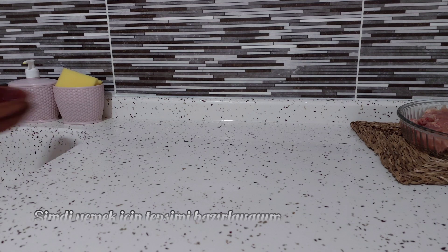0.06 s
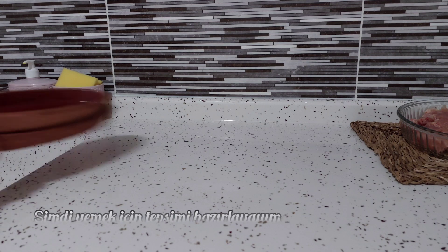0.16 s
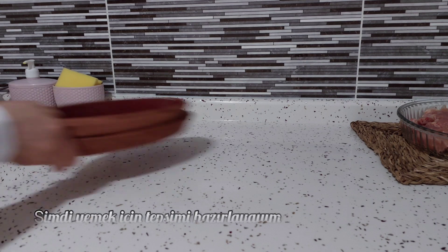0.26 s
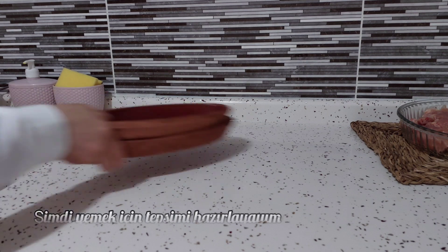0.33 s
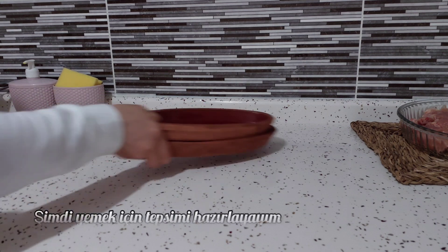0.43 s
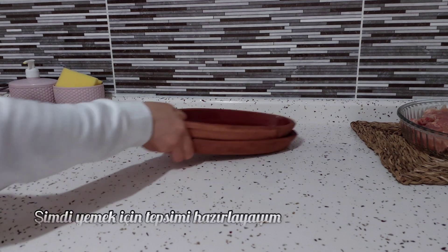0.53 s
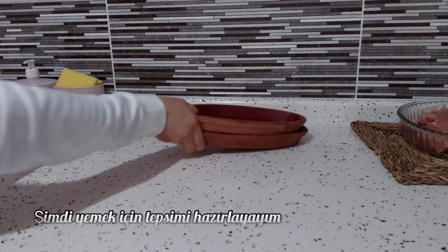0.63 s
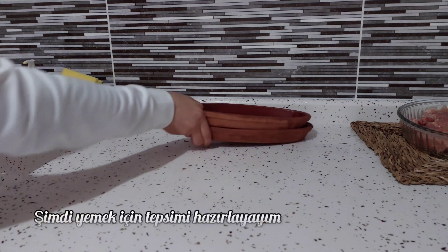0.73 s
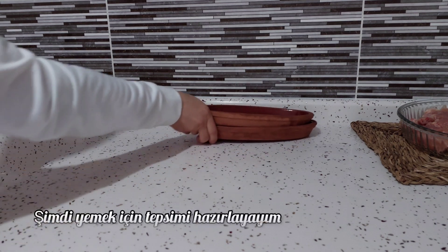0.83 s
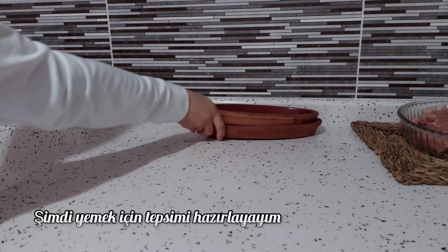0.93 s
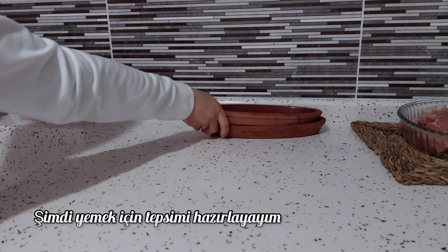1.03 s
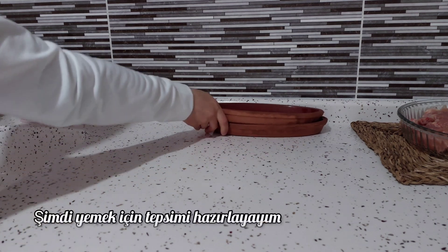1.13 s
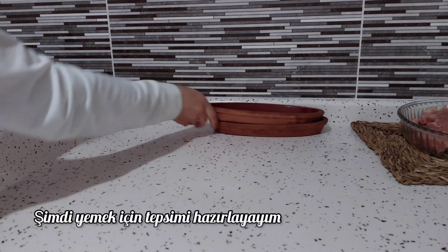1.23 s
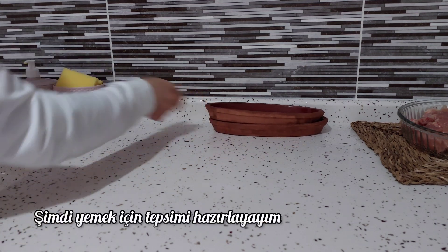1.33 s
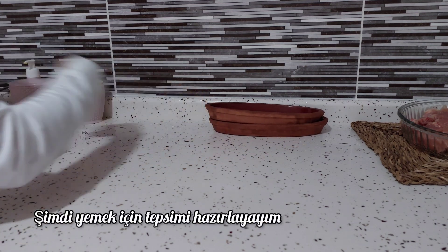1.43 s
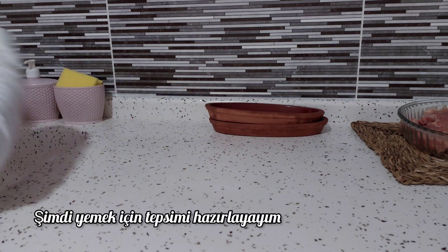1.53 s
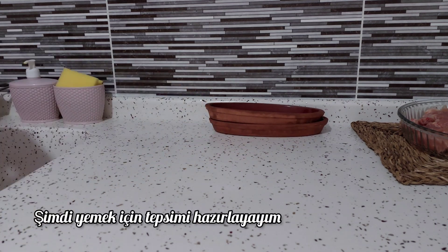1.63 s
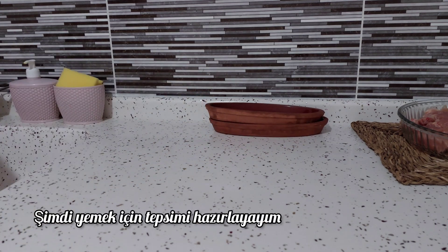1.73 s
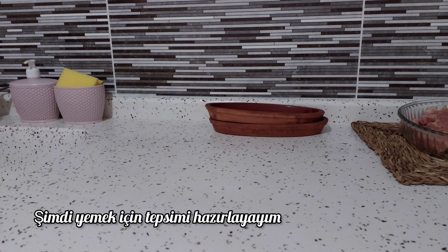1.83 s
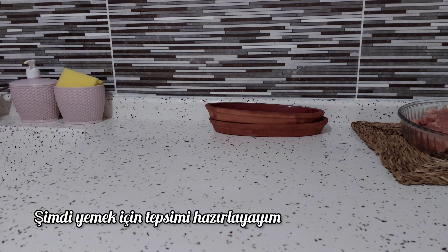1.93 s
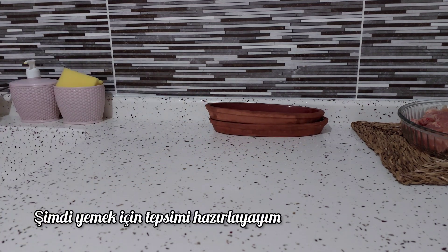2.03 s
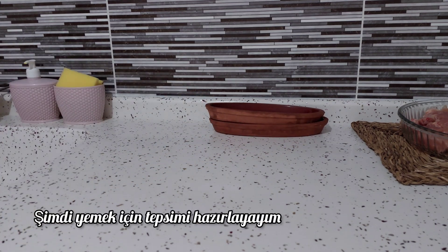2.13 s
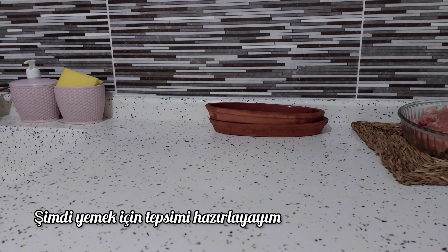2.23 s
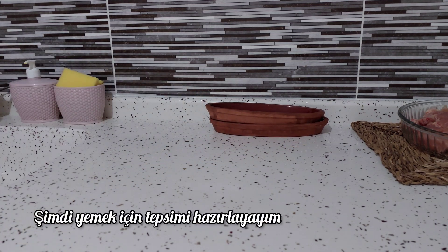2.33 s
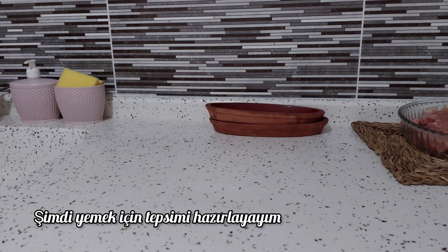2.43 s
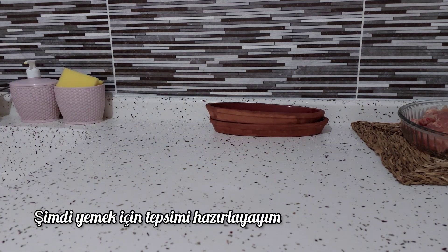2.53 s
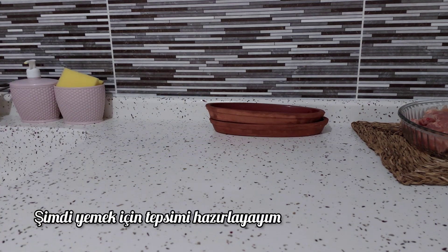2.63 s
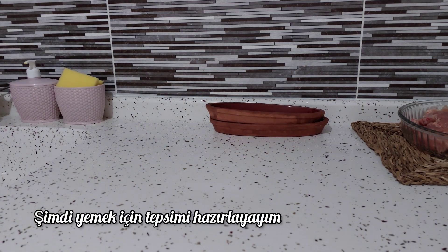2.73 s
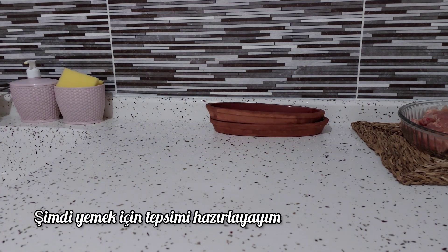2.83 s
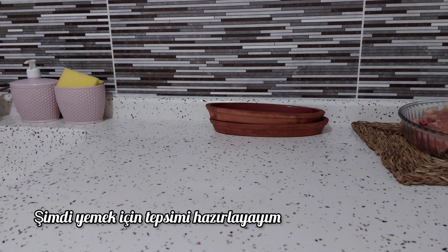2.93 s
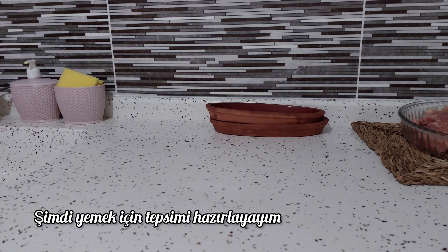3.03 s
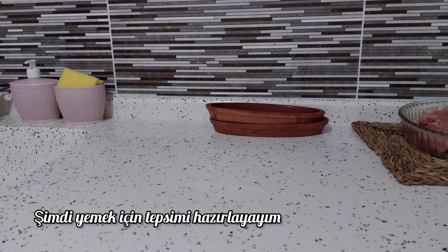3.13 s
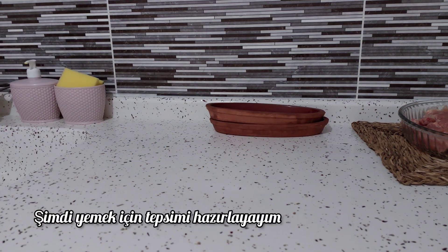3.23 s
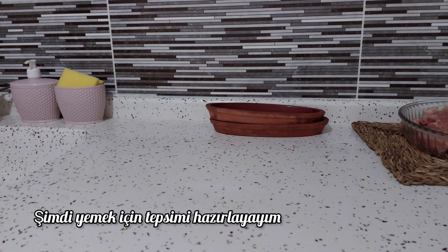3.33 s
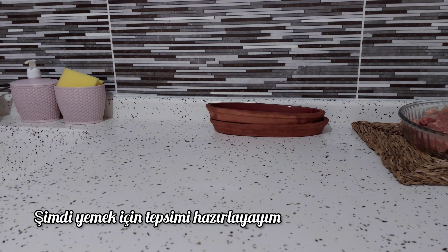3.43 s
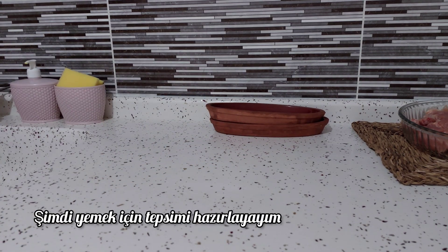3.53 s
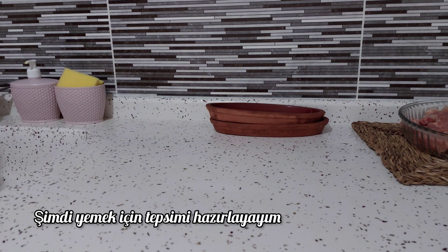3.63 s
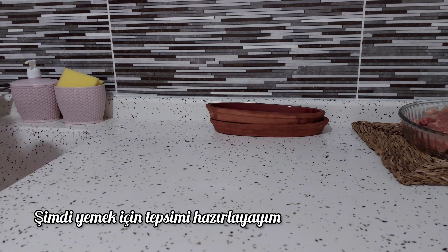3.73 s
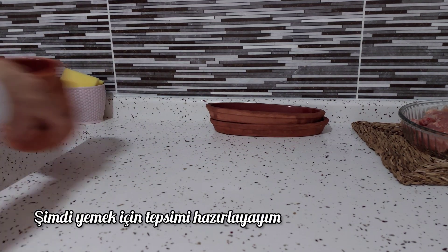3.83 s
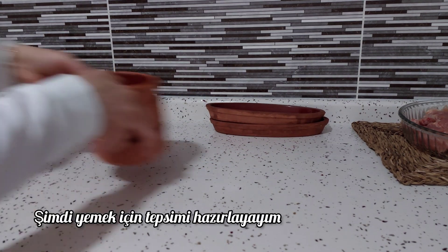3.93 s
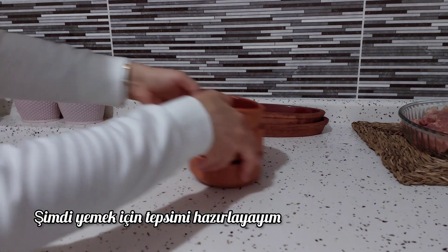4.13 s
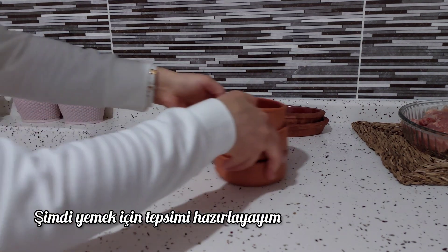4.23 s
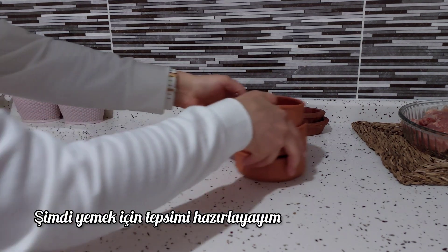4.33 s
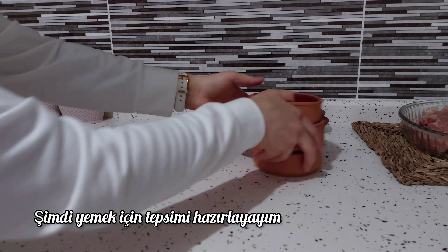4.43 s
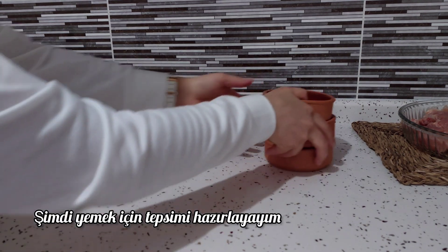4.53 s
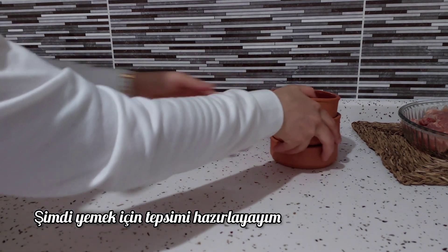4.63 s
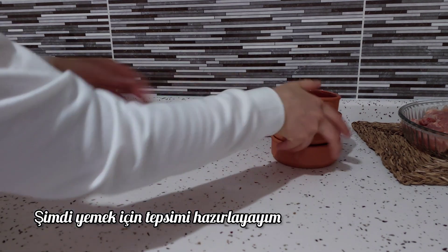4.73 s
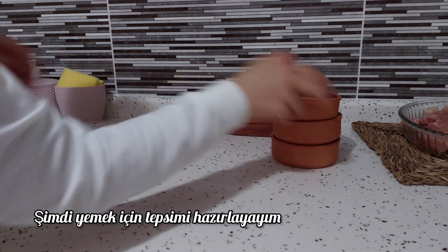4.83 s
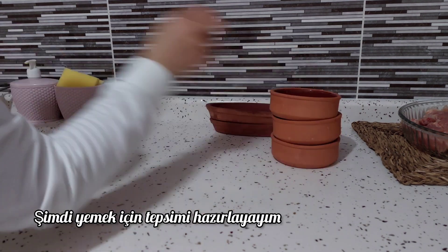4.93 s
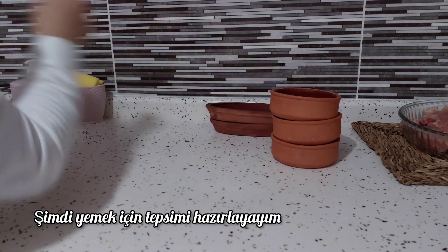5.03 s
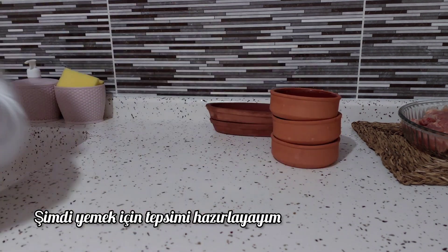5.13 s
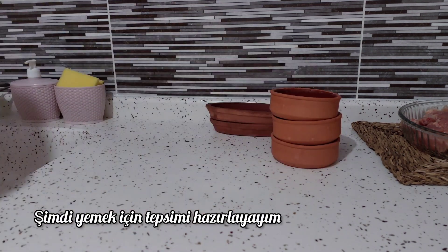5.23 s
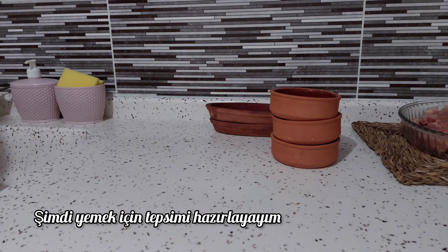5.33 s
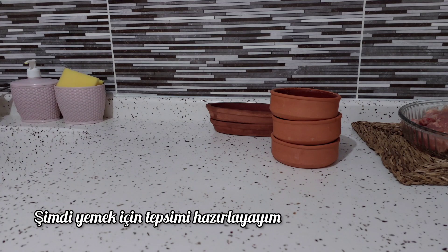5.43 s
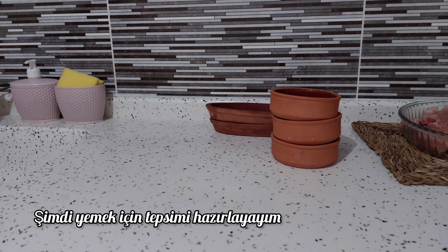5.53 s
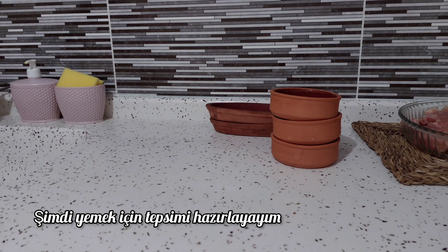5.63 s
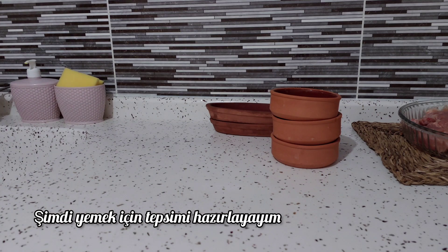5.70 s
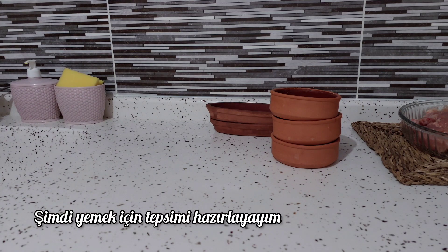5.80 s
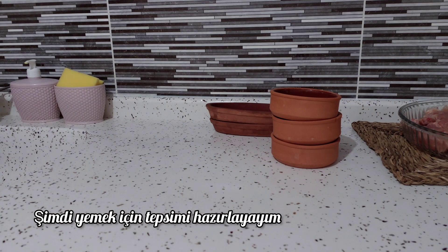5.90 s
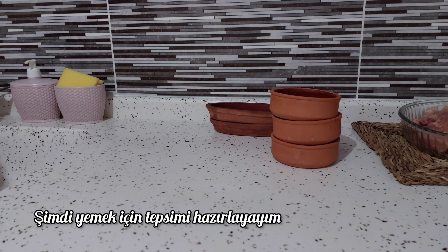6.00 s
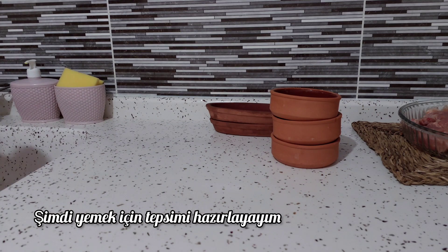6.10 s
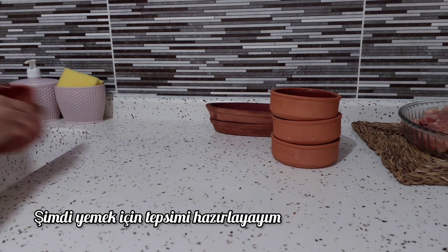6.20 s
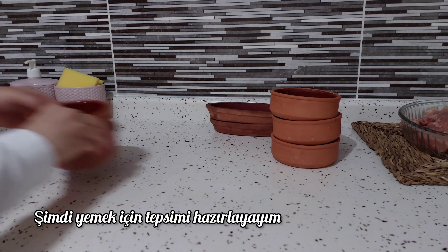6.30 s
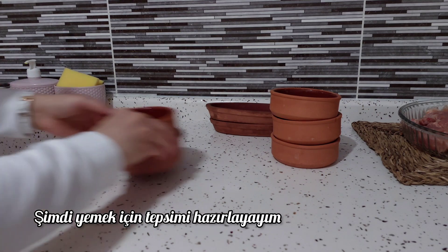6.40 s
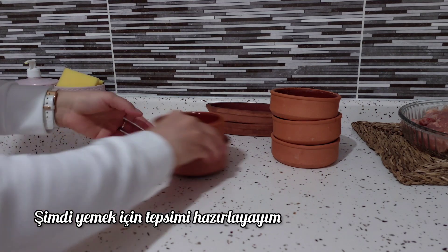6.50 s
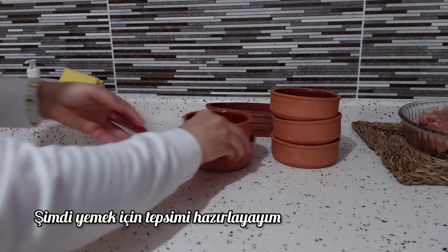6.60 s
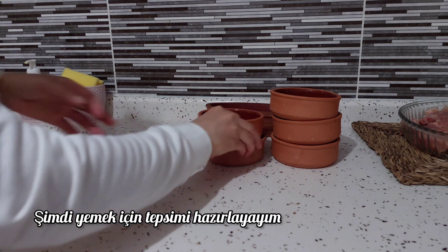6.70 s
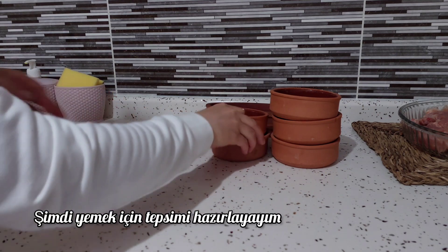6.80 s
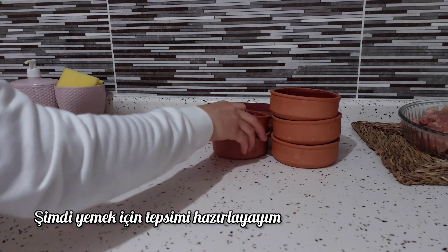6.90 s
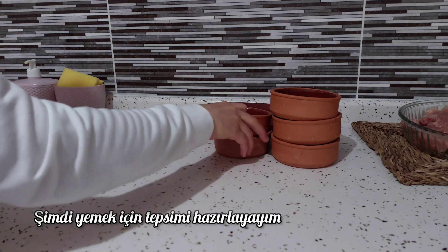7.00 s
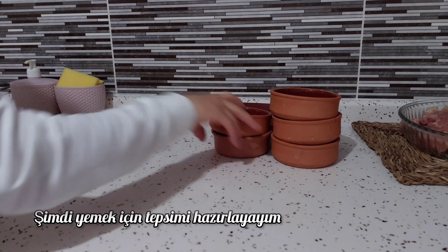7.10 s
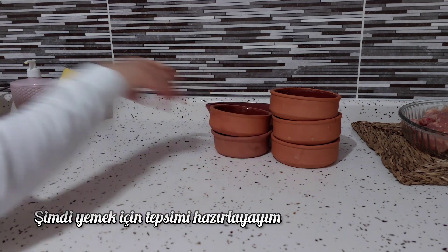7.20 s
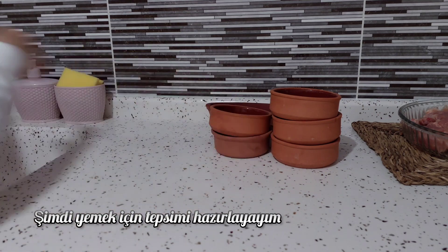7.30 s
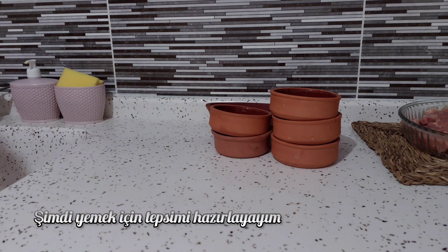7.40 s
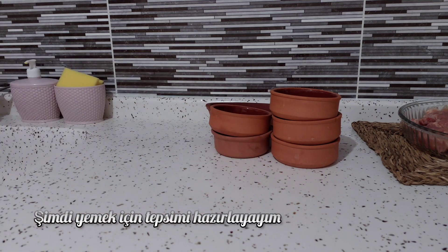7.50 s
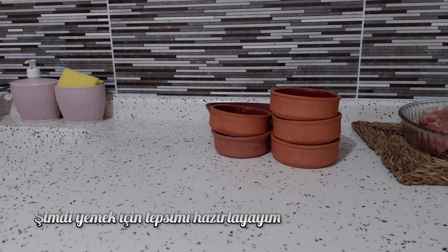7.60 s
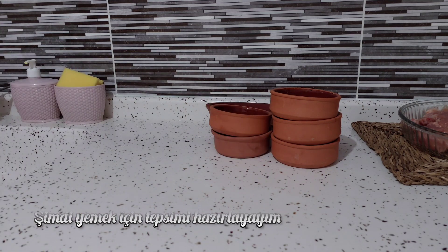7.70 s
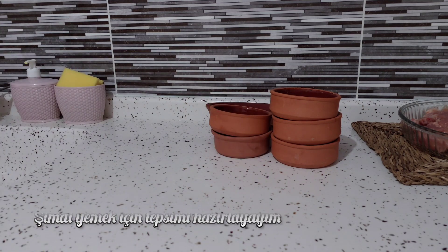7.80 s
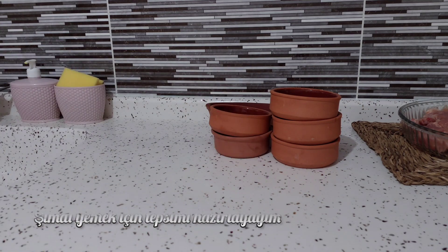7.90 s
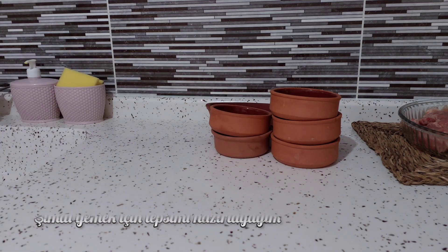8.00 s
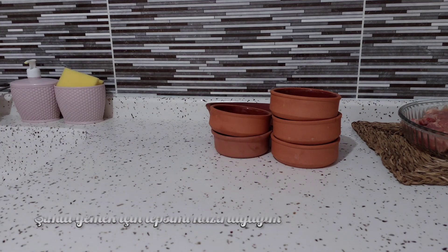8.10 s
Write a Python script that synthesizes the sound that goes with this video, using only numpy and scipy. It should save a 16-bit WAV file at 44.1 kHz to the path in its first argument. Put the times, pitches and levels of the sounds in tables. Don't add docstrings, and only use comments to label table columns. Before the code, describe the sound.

Close stereo pickup of earthenware being put on a stone worktop. The first stack strikes sharply, rocks and drags to rest. Faint dragging leads to a low, muffled bump. Light high ceramic ticks precede a single solid clack with a soft settling scrape. Gritty rubbing then brings two bursts of hollow knocks. Short bright room reflections follow each blow, over quiet low hum and hiss, with a final soft rustle of cloth.

```python
import sys
import numpy as np
from scipy import signal
from scipy.fft import rfft, irfft, next_fast_len
from scipy.io import wavfile
from scipy.ndimage import uniform_filter1d, map_coordinates

SR = 44100
rng = np.random.default_rng(int(sys.argv[2]) if len(sys.argv) > 2 else 0)


def generate_wav(signal):
    frames = np.transpose(np.atleast_2d(signal))
    scaled = np.clip(frames, -1, 1) * 32767
    pcm = np.round(scaled).astype(np.int16)
    wavfile.write(sys.argv[1], SR, pcm)


def how_loud(loudness_db):
    steps = np.asarray(loudness_db, float) / 20
    return 10 ** steps


N = 359415

# frequency in Hz, bandwidth in Hz, level in dB.
SHELF = [(195, 30, 1.5), (690, 130, -7), (1440, 27, -7), (960, 50, -9.5), (1760, 130, -7), (2160, 220, -5),
         (3685, 24, -3), (3880, 66, -10), (4140, 80, -10), (4700, 82, -23), (6550, 170, -15.5)]
# frequency in Hz, bandwidth in Hz, level in dB.
TALL_RIM = [(2000, 110, -13), (3660, 40, -9), (4030, 120, -10), (4700, 90, -17), (5940, 44, -14),
            (6460, 55, -1), (7870, 120, -13), (9420, 80, -8), (9600, 52, -9), (12600, 180, -7),
            (12950, 70, -9), (15100, 120, -16)]
SETTLING_RIM = [(4030, 850, -18.5), (6360, 58, -9), (8000, 46, -2), (9700, 220, -18), (12000, 67, -11),
                (12610, 35, -5), (13300, 34, -15), (14220, 80, -14), (15100, 110, -18)]
# frequency in Hz, bandwidth in Hz, level in dB.
DRAG = [(185, 85, -2.5), (337, 119, -1), (640, 150, 2.5), (1250, 230, -7.5), (1980, 390, -11)]
# frequency in Hz, level in dB per Hz.
BUMP_CLATTER = [(71, -27), (120, 9), (396, -20.5), (944, -16.5), (1130, -8.5), (2830, -27.5), (6000, -67.5),
                (13200, -120)]
# frequency in Hz, t60 in seconds.
KITCHEN = [(60, 0.92), (200, 0.78), (500, 0.65), (1000, 0.47), (2000, 0.42), (5000, .36), (12000, .28)]


def unit(x):
    return x / np.sqrt(np.mean(x ** 2) + 1e-20)


def along(points, hz):
    f, v = np.transpose(points)
    return np.interp(np.log(hz + 1), np.log(f + 1), v)


def wobble(rate):
    knots = rng.standard_normal(int(N * rate / SR) + 4)
    return map_coordinates(knots, [np.arange(N) * rate / SR])


def filtered(x, response):
    n = x.shape[-1]
    m = next_fast_len(n + SR // 4)
    return irfft(rfft(x, m) * response(np.fft.rfftfreq(m, 1 / SR)), m)[..., :n]


def resonances(modes, spread_db=0, steep_hz=99999):
    offset_db = rng.normal(0, 1, len(modes)) * spread_db

    def resonator(f, centre, width):
        return 1j * f * width / (centre * centre - f * f + 1j * f * width)

    def response(f):
        total = 0
        for k, (centre, width, db) in enumerate(modes):
            if centre > steep_hz:
                mode = resonator(f, centre, 2.1 * width) ** 2
            else:
                mode = resonator(f, centre, width)
            total = total + (-1) ** k * how_loud(db + offset_db[k]) * mode
        return total

    return response


def peaked(response):
    blow = 1. * (np.arange(SR // 4) == 0)
    x = filtered(blow, response)
    return x / np.abs(x).max()


def tray_stack():
    # start in seconds, peak in dB, counter thump in dB, knock centre in Hz.
    lands = [
        (.5345, -13, -18, 858),
        (.5365, -9, -26.5, 1902),
    ]
    tips = [
        (0.7888, -13, -21.5, 1651),
    ]
    rocks = [
        (0.9617, -11.5, -28, 1410),
    ]
    hits = [
        (0.9745, -16, -22, 1150),
        (0.9762, -10, -19, 2240),
    ]
    # frequency in Hz, bandwidth in Hz, level in dB.
    base = [(301.8, 34, -10.5), (840, 110, -3), (1170, 20, -10.5), (1934, 100, -7.5), (3000, 26, -17.5),
            (3188, 35, -7), (3480, 11, -6.5), (4622, 40, -18), (4980, 50, -19.5), (5302, 40, -20.5),
            (7160, 44, -25), (7640, 130, -17), (7950, 35, -24), (9646, 51, -30.5)]
    edge = [(310, 35, -7.5), (466, 57, -11.5), (700, 100, -8), (1195, 30, -2.5), (1480, 28, -7.5),
            (1955, 80, -6.5), (2150, 55, -9), (3200, 40, -22), (3600, 53, -19), (5420, 90, -18),
            (7500, 200, -30.5), (8140, 50, -31), (9700, 250.6, -30), (12000, 300, -29)]
    side = [(640, 40, -12), (1275, 70, -6), (1815, 60, -8.5), (2260, 60, -6.5), (3760, 70, -11.5),
            (5360, 90, -15), (7500, 200, -27.5), (9620, 75, -31.5), (11700, 200, -30)]
    body = [(880, 48, -9.5), (995, 50, -11), (1263, 86, -10.5), (1926, 60, -8), (2256, 39, -5.5),
            (2570, 23, -9), (3200, 36, -11.5), (4250, 300, -18.5), (5100, 170, -18), (5760, 330, -20.5),
            (7250, 140, -25), (8640, 59, -30), (11200, 80, -28.5), (14490, 500, -30.5)]
    # frequency in Hz, level in dB per Hz.
    base_clatter = [(120, -38.5), (200, -7), (842, -8.5), (1510, -19), (1880, -9.5), (2800, -20.5),
                    (7760, -31.5), (15500, -69)]
    edge_clatter = [(120, -38), (200, -1), (653, -6.5), (1500, -5.5), (2100, -13), (4500, -41), (6500, -68),
                    (15500, -70)]
    body_clatter = [(120, -39.5), (200, -9), (702, 1.5), (1090, -6), (2250, -8.5), (4500, -17.5),
                    (6500, -30), (15500, -48.5)]
    # start in seconds, rim in dB, base drag in dB, fade t60 in seconds.
    rub = [
        (0.002, -86.5, -60.5, .65),
        (.772, -65.5, -59, 0.084),
        (.94, -60, -51, 0.1),
        (.953, -56, -50, .04),
        (1.05, -69, -28.5, 0.32),
    ]
    landing = knocks(lands, base, base_clatter, ring_db=4.5, clatter_db=-10.0, clatter_t60=0.019,
                     blunt_share=0.24, lead=3.7, contact_ms=0.063, room_db=2.75)
    tipping = knocks(tips, edge, edge_clatter, ring_db=7.5, clatter_db=-9.0, clatter_t60=0.028,
                     blunt_share=0.58, lead=1.2, contact_ms=.06, room_db=2.5)
    rocking = knocks(rocks, side, edge_clatter, ring_db=5.5, clatter_db=-12.0, clatter_t60=0.013,
                     blunt_share=0.22, lead=1.6, contact_ms=.045, room_db=-0.5)
    hitting = knocks(hits, body, body_clatter, ring_db=3.5, clatter_db=-3.5, clatter_t60=0.0095,
                     blunt_share=0.2, lead=1.6, contact_ms=0.063, room_db=2.0)
    rubbing = grinding(strokes(rub, bend=1.2, swell_t60=0.062), SETTLING_RIM, DRAG, grit_db=-0.3,
                       broad_db=-13, drag_db=-6.5, room_db=-6.0, lead=4)
    return landing + tipping + rocking + hitting + rubbing


def shelf_stack():
    # start in seconds, peak in dB, counter thump in dB, knock centre in Hz.
    lift = [
        (2.808, -37.5, -10, 2040),
    ]
    hits = [
        (2.905, -20.5, -18.5, 460),
        (2.914, -20.5, -17, 670),
        (2.926, -24, -9, 550),
    ]
    # frequency in Hz, level in dB per Hz.
    lift_clatter = [(88, -30), (150, 0.5), (906, 1), (1650, -23), (2100, -5), (2530, -32), (3760, -30.5),
                    (11700, -67)]
    hit_clatter = [(71, -42), (150, -5), (245, -15.5), (733, 1), (3000, -21.5), (6600, -68), (9510, -57),
                   (15500, -78)]
    # start in seconds, rim in dB, base drag in dB, fade t60 in seconds.
    rub = [
        (2.006, -92, -77.5, 0.58),
        (2.242, -86.5, -55, 0.46),
        (2.31, -91, -62.5, 0.55),
        (2.37, -77, -73, 0.41),
        (2.5, -82, -67.5, 1),
        (2.91, -58, -51, 0.21),
    ]
    # frequency in Hz, bandwidth in Hz, level in dB.
    drag = [(197, 173, 8.5), (476, 440, 4.5), (1145, 190, 1.5), (1450, 140, -10), (2100, 230, -5.5),
            (2380, 190, -10.5)]
    lifting = knocks(lift, SHELF[1:3], lift_clatter, ring_db=-5.0, clatter_db=-6.5, clatter_t60=0.35,
                     blunt_share=0.081, lead=3.6, contact_ms=0.086, room_db=2.5)
    hitting = knocks(hits, SHELF, hit_clatter, ring_db=0.5, clatter_db=-7, clatter_t60=0.04,
                     blunt_share=0.98, lead=7, contact_ms=0.029, room_db=4.0)
    rubbing = grinding(strokes(rub, bend=1.056, swell_t60=0.056), TALL_RIM, drag, grit_db=3.0,
                       broad_db=-29.5, drag_db=5.0, room_db=-2.5, lead=9.9)
    return lifting + hitting + rubbing


def tall_stack():
    # start in seconds, peak in dB, counter thump in dB, knock centre in Hz.
    hits = [
        (4.167, -9.5, -28.5, 1060),
    ]
    # start in seconds, peak in dB.
    chatter = [
        (3.531, -44.5),
        (3.541, -41.5),
        (3.58, -36.5),
        (3.618, -43),
        (3.6715, -48.5),
    ]
    taps = [(s, db, -40.5, 6550) for s, db in chatter]
    # frequency in Hz, bandwidth in Hz, level in dB.
    body = [(559, 110, -2), (773, 40, -4.5), (983, 33, -9.5), (1906, 330, -4.5), (2383, 138, -18.5),
            (3680, 40, -18), (4010, 230, -10.5), (4540, 56, -19), (6425, 110, -4), (8230, 45, -22.5),
            (8860, 44, -26), (12620, 95, -34.5)]
    # frequency in Hz, level in dB per Hz.
    clatter = [(120, -53.5), (200, -21.5), (1030, -2.5), (1840, -3.5), (5390, -33), (6590, -29.5),
               (10600, -45), (15500, -63)]
    # start in seconds, rim in dB, base drag in dB, fade t60 in seconds.
    rub = [(3.3, -81, -75.5, 0.74), (3.36, -79.5, -74, .6), (3.4, -74, -84, 0.55),
           (3.45, -69.5, -66.5, 0.33), (3.528, -50, -72, 0.1), (3.543, -47, -71, 0.083),
           (3.58, -52.5, -68.5, 0.23), (3.67, -62.5, -69, 0.14)]
    settling = [
        (4.172, -62.5, -46, 0.2),
        (4.29, -63.5, -40.5, 0.81),
        (4.42, -68.5, -51.5, 0.54),
        (4.55, -73, -58, .35),
    ]
    # frequency in Hz, bandwidth in Hz, level in dB.
    drag = [(600, 76, 7.5), (1042, 370, -23), (1900, 325, -9), (2070, 260, -4.5)]
    hitting = knocks(hits, body, clatter, ring_db=9.5, clatter_db=-14, clatter_t60=0.032,
                     blunt_share=0.22, lead=2.1, contact_ms=0.048, room_db=4.0)
    tapping = knocks(taps, TALL_RIM, clatter, ring_db=7, clatter_db=-29.0, clatter_t60=0.031,
                     blunt_share=0.079, lead=8.2, contact_ms=0.0205, room_db=-1.0)
    carrying = grinding(strokes(rub, bend=1.2, swell_t60=.025), TALL_RIM, drag, grit_db=4.5,
                        broad_db=-25.0, drag_db=1.5, room_db=-5, lead=8.75, pan_db=3.5)
    resting = grinding(strokes(settling, bend=1.6, swell_t60=.015), SETTLING_RIM, DRAG, grit_db=3.5,
                       broad_db=-26, drag_db=-4.0, room_db=-2.0, lead=2.7)
    return hitting + tapping + carrying + resting


def small_stack():
    # start in seconds, peak in dB, counter thump in dB, knock centre or slip note in Hz.
    lands = [
        (6.556, -14, -29.5, 1296),
        (6.5588, -12.5, -30, 750),
        (6.571, -21, -9.5, 964),
    ]
    hits = [
        (6.6808, -13.5, -23, 1150),
        (6.707, -12.5, -18.5, 1300),
        (6.7128, -15, -24.5, 780),
        (6.7225, -19.5, -25, 1250),
    ]
    slips = [
        (6.345, -46.5, -32, 1002),
        (6.393, -48, -33.5, 946),
        (6.431, -38, -22, 986),
    ]
    # frequency in Hz, bandwidth in Hz, level in dB.
    base = [(350, 16, -6.5), (750, 53, -2), (964, 30, -9.5), (1720, 50, -10.5), (2280, 39, -6),
            (2550, 40, -6.5), (3620, 60, -12), (4100, 77, -10.5), (6010, 90, -18.5), (7840, 100, -17),
            (9200, 200, -26), (10900, 120, -25), (13500, 250, -23.5)]
    body = [(355, 24, -5), (750, 70, -6.5), (964, 20, -7.5), (1150, 79, -1.5), (1400, 50, -4.5),
            (1745, 23, -8), (2310, 60, -10.5), (3290, 160, -13), (4210, 45, -11), (5440, 200, -21.5),
            (7500, 140, -23), (9000, 180, -25.5), (10800, 130, -27.5), (13600, 150, -21.5)]
    # frequency in Hz, level in dB per Hz.
    clatter = [(120, -44.5), (200, -17.5), (769, -2), (2330, -11.5), (3890, -22), (4260, -16.5),
               (4840, -29.5), (15500, -48)]
    # start in seconds, rim in dB, base drag in dB, fade t60 in seconds.
    rub = [(5.587, -67, -59, 0.31), (5.83, -72.5, -70, 0.58), (5.94, -59, -55.5, 0.17),
           (6.16, -65.5, -62, .4), (6.347, -57, -54, 0.38), (6.535, -68, -65, 0.02),
           (6.562, -50.5, -58.5, 0.12), (6.711, -50, -59.5, 0.13), (6.8, -63, -48.5, 0.31),
           (6.93, -60.5, -45.5, 0.15)]
    # frequency in Hz, bandwidth in Hz, level in dB.
    rim = [(1720, 170, -5), (2240, 120, -4), (3700, 180, -1.5), (4153, 110, -2), (4835, 117, -12.5),
           (6190, 130, -0.5), (7144, 80, -11), (7670, 170, -5.5), (9400, 260, -7), (10800, 130, -6),
           (12800, 200, -7.5), (13410, 190, -11), (14600, 180, -6.5)]
    drag = [(278, 450, -6.5), (650, 390, 0), (999, 220, -0.5), (1796, 450, -8.5), (2205, 136, -10)]
    landing = knocks(lands, base, clatter, ring_db=-0.5, clatter_db=-7.5, clatter_t60=0.031,
                     blunt_share=0.19, lead=3.3, contact_ms=0.026, room_db=-0.9)
    hitting = knocks(hits, body, clatter, ring_db=5.5, clatter_db=-4.5, clatter_t60=0.037,
                     blunt_share=0.32, lead=5.3, contact_ms=0.036, room_db=-3.5)
    slipping = knocks(slips, body[2:3], BUMP_CLATTER, ring_db=-20.5, clatter_db=-25.5, clatter_t60=.05,
                      blunt_share=0.05, lead=5.6, contact_ms=0.073, room_db=-6.5)
    rubbing = grinding(strokes(rub, bend=1.63, swell_t60=0.032), rim, drag, grit_db=0.5,
                       broad_db=-20, drag_db=-3, room_db=-4.5, lead=7)
    return landing + hitting + slipping + rubbing


def bumps():
    # start in seconds, peak in dB, counter thump in dB, note in Hz.
    near = [
        (1.046, -29, -27, 693),
        (4.279, -22, -32, 606),
        (4.291, -24.5, -8.5, 563),
        (4.298, -33.5, -24.5, 640),
    ]
    far = [
        (2.213, -54.5, 7.5, 323),
        (2.239, -48.5, 1, 300.5),
        (2.888, -30, -4, 150),
        (2.946, -31.5, -13.5, 717),
        (5.601, -49.5, 1.5, 311),
        (5.634, -54.5, -9, 386),
    ]
    close = knocks(near, SHELF[:3], BUMP_CLATTER, ring_db=-15.5, clatter_db=-11.5, clatter_t60=0.071,
                   blunt_share=0.11, lead=4, contact_ms=0.065, room_db=-5.5)
    distant = knocks(far, SHELF[:3], BUMP_CLATTER, ring_db=-8.5, clatter_db=-13.0, clatter_t60=0.045,
                     blunt_share=0.19, lead=6.3, contact_ms=0.053, room_db=6)
    return close + distant


def knocks(hits, modes, clatter, ring_db, clatter_db, clatter_t60, blunt_share, lead, contact_ms, room_db):
    # frequency in Hz, bandwidth in Hz, level in dB.
    counter = [(70, 17, 5), (150, 20, 3), (202, 28, -1), (321, 16, 2.5), (435, 200, -10)]
    steep_hz = 2900
    out = np.zeros((2, N + SR))
    t = np.arange(SR // 4) / SR
    for s, db, thump_db, knock_hz in hits:
        soft = lambda f: 1 / (1 + 2j * np.pi * f * contact_ms / 1000) ** 2
        ring = resonances(modes, spread_db=1.5, steep_hz=steep_hz)
        blunt = resonances([(knock_hz, blunt_share * knock_hz, 0)], steep_hz=0)
        rims = lambda f: 1 + 1j * f / 4500
        clay = peaked(lambda f: soft(f) * (soft(f) * blunt(f) + how_loud(ring_db) * rims(f) * ring(f)))

        grain = rng.standard_normal(len(t))
        dense = unit(filtered(grain, lambda f: how_loud(along(clatter, f)) / along(KITCHEN, f)))
        onset = 1 - np.exp(-(t * 1000 / contact_ms / 12) ** 2)
        rattle = how_loud(clatter_db - 60 * t / clatter_t60) * onset * dense

        slab = resonances(counter, spread_db=3.0)
        thump = how_loud(thump_db) * peaked(lambda f: slab(f) / (1 + 1j * f / 700) ** 2)

        dry = how_loud(db) * (clay + rattle + thump)
        wet = how_loud(room_db) * kitchen(dry, gap_s=0.00094)
        start = round((s + 0.00074) * SR)
        out[:, start:start + len(t)] += placed(dry, .6, lead)
        out[:, start:start + wet.shape[1]] += wet
    return out[:, :N]


def grinding(pressure, rim, drag, grit_db, broad_db, drag_db, room_db, lead, pan_db=2.0):
    rim_gain, drag_gain = pressure
    roughness = np.array([wobble(430) + wobble(60), .5 * wobble(40)])
    grit = rng.standard_normal((2, N)) * how_loud(grit_db * roughness)
    sing = resonances(rim)
    hum = resonances(drag)
    scrape = filtered(grit[0], lambda f: sing(f) + how_loud(broad_db) * 1j * f / (2500 + 1j * f))
    top = unit(patchy(scrape, depth_db=4.0))
    base = unit(filtered(grit[1], lambda f: hum(f) / (1 + (f / 2500) ** 6)))
    dry = rim_gain * top + how_loud(drag_db) * drag_gain * base
    return how_loud(-3) * placed(dry, pan_db, lead) + how_loud(room_db) * kitchen(dry, gap_s=0.00056)[:, :N]


def strokes(rows, bend, swell_t60):
    t = np.arange(N) / SR
    gain = 0
    for s, *db, fade in rows:
        before = np.maximum(s - t, 0) / swell_t60
        after = np.maximum(t - s, 0) / fade
        gain = gain + how_loud(np.array(db)[:, None] - 60 * (before + after ** bend))
    return gain


def patchy(x, depth_db):
    z = signal.stft(x, nperseg=256)[2]
    field = uniform_filter1d(rng.standard_normal(z.shape), size=4, axis=0)
    field = uniform_filter1d(field, size=20, axis=1)
    return signal.istft(z * how_loud(depth_db * unit(field)), nperseg=256)[1][:N]


def songs():
    # start in seconds, length in seconds, first pitch in Hz, last pitch in Hz, level in dB.
    glides = [(2.25, 0.065, 3700, 3700, -87), (2.363, .09, 3700, 3780, -79), (2.5, .07, 2320, 2240, -72),
              (2.575, .1, 2150, 2080, -74), (2.551, 0.18, 1042, 1132, -72.5),
              (3.399, 0.075, 1720, 1810, -72), (3.441, 0.077, 1840, 2100, -68),
              (3.527, 0.19, 1903, 2054, -68.5), (5.929, 0.049, 3700, 3700, -65),
              (5.939, 0.066, 608, 627, -59.5), (6.146, 0.1, 631, 656, -65.5),
              (6.153, 0.081, 2240, 2226, -63), (6.378, 0.091, 2280, 2280, -65.5),
              (6.885, 0.098, 3595, 3680, -64), (6.899, 0.15, 350, 373, -57)]
    relative_width = .07
    dry = np.zeros(N)
    for s, length, first_hz, last_hz, db in glides:
        n = round(length * SR)
        knots = np.arange(n) * relative_width * first_hz / SR
        places = np.broadcast_arrays([[0], [1]], knots)
        grit = map_coordinates(rng.standard_normal((2, 64)), places, mode="wrap")
        turn = 2 * np.pi * np.cumsum(np.linspace(first_hz, last_hz, n)) / SR
        swell = np.sin(np.pi * np.linspace(0, 1, n) ** 0.91)
        tone = grit[0] * np.cos(turn) + grit[1] * np.sin(turn)
        dry[round(s * SR):][:n] += how_loud(db) * swell * tone
    return placed(dry, 1, 8.0) + how_loud(-5) * kitchen(dry, gap_s=0.0007)[:, :N]


def placed(x, pan_db, lead):
    level = how_loud([[pan_db], [-pan_db]])
    delay = np.array([[0], [lead]])
    return filtered(x, lambda f: level * np.exp(-2j * np.pi * f / SR * delay))


def pair(two):
    # frequency in Hz, left-right likeness from 0 to 1.
    alike = [(60, .995), (150, .97), (300, .8), (600, .2), (1200, .2), (3000, .45), (6000, .2), (12000, .1)]
    turn = lambda hz: np.arccos(np.clip(along(alike, hz), 0, 1)) / 2
    mid, side = filtered(two, lambda hz: np.array([np.cos(turn(hz)), np.sin(turn(hz))]))
    return np.array([mid + side, mid - side])


def kitchen(x, gap_s):
    length = 30000
    hz, t, z = signal.stft(rng.standard_normal((2, length)), SR, nperseg=256)
    decay = how_loud(-60 * t / along(KITCHEN, hz)[:, None])
    tail = pair(signal.istft(z * decay, SR, nperseg=256)[1])[:, :length]
    t = np.arange(length) / SR
    wall = 1 + 0.32 * np.exp(-t / 0.017)
    tail = tail * (1 - np.exp(-t / gap_s)) * wall
    return signal.fftconvolve(x[None], tail / np.linalg.norm(tail[0]), axes=1)


def noise(spectrum):
    return unit(filtered(pair(rng.standard_normal((2, N))), lambda hz: how_loud(along(spectrum, hz))))


def sleeve():
    # start in seconds, level in dB, fade t60 in seconds.
    sweeps = [
        (7.75, -71.5, 0.88),
        (7.8, -60.5, 0.79),
        (7.96, -64.5, 0.4),
    ]
    # frequency in Hz, level in dB per Hz.
    cloth = [(290, -8.5), (500, -8.5), (904, -14), (1940, -16), (8860, -21.5), (12200, -20), (15800, -20.5)]
    return strokes(sweeps, bend=0.76, swell_t60=0.072) * how_loud(1.74 * wobble(40)) * noise(cloth)


def background():
    # time in seconds, level in dB.
    hum = [(0, -56.5), (1.75, -66), (2.05, -60.5), (4.0, -57), (4.9, -64), (7.1, -58), (7.5, -66.5),
           (7.85, -59.5), (8.15, -60.5)]
    # frequency in Hz, level in dB per Hz.
    air = [(30, -7), (110, -1), (155, -13), (200, -11.5), (390, -19), (710, -29.5), (1800, -52.5),
           (2340, -80.5)]
    hiss = [(710, -41), (1200, 3), (1870, -11), (2470, -10), (4570, -11), (7110, -6.5), (15800, -9.5)]
    # frequency in Hz, level in dB rms.
    motor = [(102.3, -76.5), (123.8, -70), (183.0, -75.5), (236.9, -82.5), (301.5, -85), (463.0, -79.5)]
    buzz = [(199.5, -68.5), (301.5, -70.5)]
    t = np.arange(N) / SR

    def line(hz, db):
        level = np.sqrt(2) * how_loud(db + 2.2 * wobble(1.4))
        return level * np.sin(2 * np.pi * hz * t + 0.36 * wobble(4.9))

    buzz_gain = how_loud(-6.5 * t) * np.clip((2.06 - t) / 0.046, 0, 1)
    buzzing = buzz_gain * sum(line(*row) for row in buzz)
    rumble = how_loud(np.interp(t, *np.transpose(hum)) - 3.0 + 0.81 * wobble(22)) * noise(air)
    running = how_loud(1.5 - 0.4 * t) * sum(line(*row) for row in motor)
    return rumble + running + buzzing + how_loud(-87) * noise(hiss)


def scene():
    stacks = tray_stack() + shelf_stack() + tall_stack() + small_stack()
    return stacks + bumps() + songs() + sleeve() + background()


def roll_off(x):
    return signal.sosfilt(signal.butter(12, 16360, fs=SR, output="sos"), x)


def record(dry):
    mic = filtered(dry, lambda f: (1j * f / (40 + 1j * f)) ** 3 * (f < 15800))
    return roll_off(mic)


dry = scene()
out = record(dry)
generate_wav(out)
```